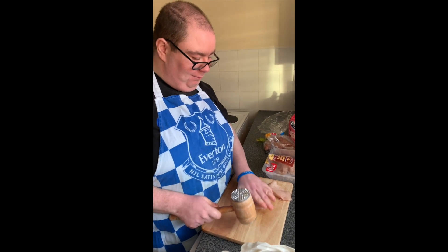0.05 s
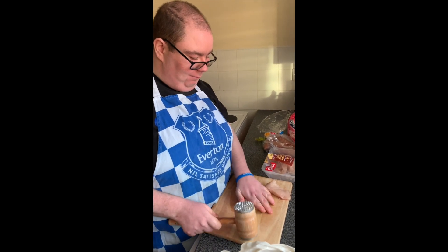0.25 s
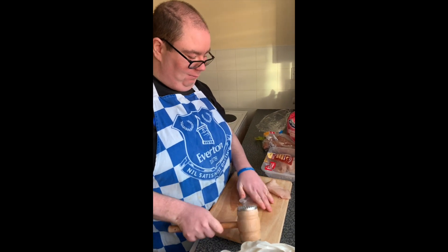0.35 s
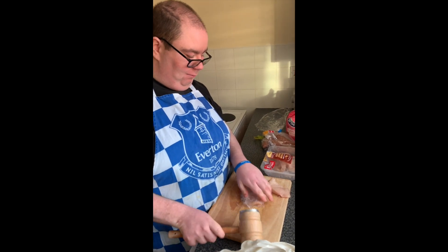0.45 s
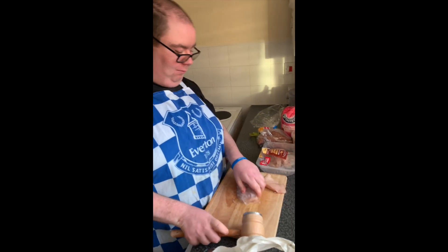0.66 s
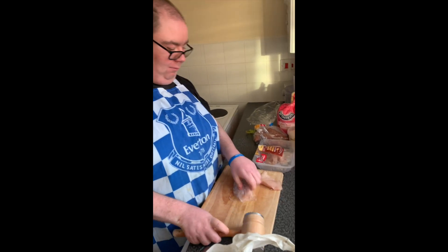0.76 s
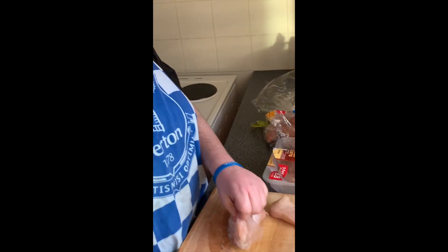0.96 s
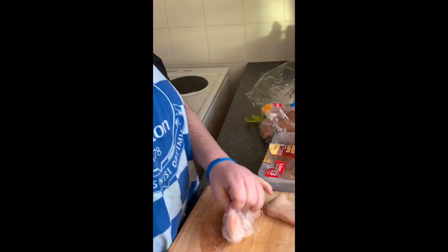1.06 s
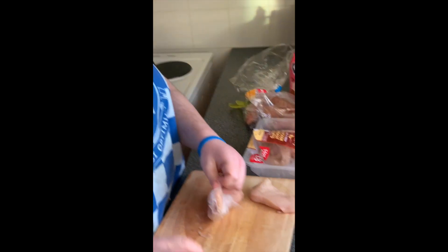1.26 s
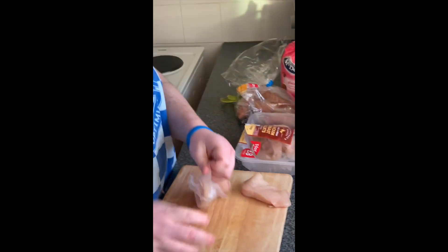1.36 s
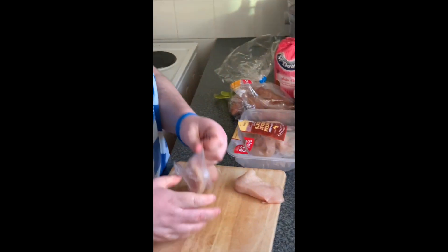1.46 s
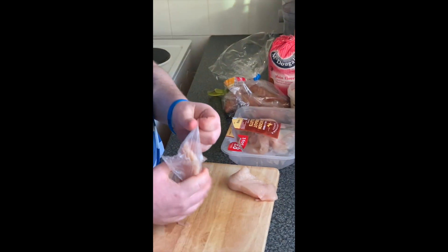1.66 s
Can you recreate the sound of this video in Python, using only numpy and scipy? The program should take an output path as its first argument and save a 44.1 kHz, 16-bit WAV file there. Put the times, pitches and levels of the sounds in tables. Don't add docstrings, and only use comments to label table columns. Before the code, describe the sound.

A meat mallet thuds on bagged chicken on a wooden board, heard close in a small tiled kitchen. After a faint rustle near 0.1 s, blows land at about 0.24, 0.52 and 0.8 s, the first bouncing rapidly, each with a plastic slap and low worktop boom. Softer knocks at 1.1-1.2 s lay the mallet down; the bag rustles until 1.5 s over faint fridge hum, with a slight late rattle.

```python
import sys
import numpy as np
from scipy import signal
from scipy.fft import rfft, irfft, next_fast_len
from scipy.io import wavfile
from scipy.ndimage import map_coordinates

SR = 44100
rng = np.random.default_rng(int(sys.argv[2]) if len(sys.argv) > 2 else 0)


def level_to_linear(level):
    exponent = np.asarray(level, float) / 20
    return 10 ** exponent


def output_pcm(signal):
    pcm = np.clip(np.atleast_2d(signal).T, -1, 1) * 32767
    wavfile.write(sys.argv[1], SR, np.round(pcm).astype(np.int16))


N = 74970

# f/Hz, density/dB per Hz
AIR_SPECTRUM = [(25, -4), (55, 6.5), (110, -6.5), (165, -12.5), (300, -7.5), (1000, -14), (3000, -28),
                (15600, -42.5)]
# f/Hz, likeness/0..1
AIR_LIKENESS = [(60, .99), (200, .88), (1000, .5), (5000, .6), (7000, .93), (15000, .96)]
# t/s, level/dB
AIR_DRIFT = [(0, -2), (.1, -0.5), (.2, 2.5), (.45, 6), (.75, 6), (1.05, 0.5), (1.3, 1), (1.45, 1),
             (1.58, 4), (1.7, 0.5)]
# f/Hz, width/Hz, level/dB
FRIDGE_HUMS = [(105, 22, -51.5), (285, 28, -60.5), (914, 40, -65)]
RATTLE_FROM_S, RATTLE = 1.39, (1385, 48, -60)

# t/s, level/dB
HANDLING_LEVEL = [(0, -70), (0.035, -67.5), (0.068, -62.5), (0.097, -44.5), (0.195, -66.5), (0.225, -68),
                  (0.245, -58), (0.41, -53), (0.49, -63), (0.53, -55.5), (0.74, -61), (0.81, -55),
                  (0.98, -55.5), (1.14, -61), (1.4, -53.5), (1.525, -67.5), (1.62, -62), (1.7, -65)]
# f/Hz, density/dB per Hz
BAG_SPECTRUM = [(500, -5), (1500, -2), (2600, -1.5), (5000, -8), (7000, -7.5), (8600, -5.5), (13500, -15.5),
                (15700, -16)]
# f/Hz, likeness/0..1
BAG_LIKENESS = [(500, 0.17), (3000, 0.067), (6500, 0.76), (15000, 1)]

# t/s, level/dB, centre f/Hz, t60/s
BAG_SCUFFS = [
    (0.082, -37, 2900, 0.14),
    (0.41, -39, 595, 0.36),
    (0.29, -35.5, 1180, 0.081),
    (0.745, -32, 223, 0.23),
    (0.850, -36, 2030, 0.2),
    (1.105, -39.5, 610, 0.7),
    (1.450, -43, 750, 0.25),
    (0.815, -42, 6000, 0.32),
    (1.240, -34.5, 276, 0.24),
]
# t/s, level/dB, centre f/Hz, t60/s
BAG_SLAPS = [(0.2355, -29, 716, 0.044), (0.235, -40, 2030, 0.087), (0.235, -35, 3760, 0.045),
             (0.297, -34.5, 1120, 0.035), (0.299, -39.5, 3370, 0.037), (0.511, -26.5, 1650, 0.096),
             (0.515, -18, 3000, 0.039), (0.517, -43, 4900, 0.12), (0.800, -32, 855, 0.063),
             (0.801, -38.5, 2720, 0.19), (0.822, -33.5, 1380, 0.1), (1.097, -45, 940, 0.084),
             (1.169, -30.5, 1470, 0.049), (1.168, -32.5, 2730, 0.027), (1.265, -50.5, 1880, 0.059),
             (1.396, -52, 1380, 0.057), (1.432, -45, 4200, 0.059)]
SLAP_RISE_S, SCUFF_RISE_S, SLAP_WIDTH = 0.00091, 0.0096, 0.41

# t/s, level/dB, pitch f/Hz, t60/s
WORKTOP_BOOMS = [(0.128, -35, 73, .6), (0.238, -20, 99.7, 0.22), (0.280, -16, 76.3, 0.31),
                 (0.340, -24.5, 81, 0.33), (0.413, -50, 74, 0.46), (0.487, -27.5, 81, 0.74),
                 (0.523, -17.5, 102, 0.28), (0.555, -14.5, 75.1, 0.59), (0.659, -26.5, 74, 0.98),
                 (0.805, -25.5, 92, 0.51), (0.866, -22, 69.3, 0.53), (0.984, -36, 75.8, 0.37),
                 (1.102, -40, 105, 0.75), (1.179, -26, 106, 0.39), (1.225, -21, 82.8, 0.23),
                 (1.265, -32.5, 85.3, 0.29), (1.309, -29.5, 79, 0.27), (1.379, -31.5, 60, 0.11),
                 (1.479, -41, 70, 0.3)]
# multiple of the pitch, level/dB, share of the t60
WORKTOP_MODES = [(.62, -12, 0.82), (1.001, 3, 0.87), (1.4, -10, 1), (1.9, -29, 0.21)]

# t/s, thud level/dB, focus f/Hz, focus width/ln Hz, decay stretch
MALLET_CONTACTS = [(0.209, -35.5, 285, 0.55, 0.67), (0.2346, -21, 615, 1, 0.79),
                   (0.2461, -8.5, 325, 0.31, 0.67), (0.2643, -19.5, 330, 0.48, 0.67),
                   (0.286, -26, 275, 0.84, 1.54), (0.304, -20.5, 286, 0.63, 0.83),
                   (0.323, -21, 280, 0.63, 0.53), (0.353, -29.5, 260, 0.47, 1.2),
                   (0.381, -27.5, 238, 0.28, 0.89), (0.446, -24.5, 227, 0.33, 1.6),
                   (0.512, -16, 864, 0.93, 0.89), (0.5231, -4, 260, 0.33, 0.28),
                   (0.535, -14, 352, 0.32, 0.94), (0.556, -22, 219, 0.42, 0.92),
                   (0.658, -33.5, 245, 0.39, 1.6), (0.720, -34.5, 231, 0.47, 0.75),
                   (0.800, -8, 750, 0.71, 0.49), (0.814, -10, 403, 0.74, 0.31),
                   (0.826, -8.5, 351, 0.28, 0.54), (0.867, -28.5, 400, 0.61, 0.68),
                   (1.097, -33.5, 700, 0.95, 1.02), (1.138, -30, 210, 0.78, 1.64),
                   (1.178, -26, 205, 0.58, 0.6), (1.196, -25, 260, 0.93, 0.42)]
# f/Hz, level/dB, t60/s
BOARD_MODES = [(205, -5, 0.16), (260, 0, .12), (320.8, -2, 0.16), (408.2, 5.5, 0.061), (454.8, -1.5, 0.085),
               (527.7, -2, 0.15), (635.3, 3.5, 0.072), (750, -5.5, 0.12), (851, -9, 0.1),
               (953, -3.5, 0.047), (1027, -2, 0.042), (1235, -7.5, 0.064), (1427, -4, 0.044),
               (1643, -4, 0.033)]
BOARD_RISE_S, WORKTOP_RISE_S, SCATTER_DB = 0.0016, 0.0059, 4

# t/s, level/dB, f/Hz, t60/s
BOARD_KNOCKS = [(0.235, -21.5, 418, 0.069), (0.306, -16, 230, 0.048), (0.456, -19, 221.4, 0.14),
                (0.5563, -11.5, 171, 0.025), (0.805, -15, 606, 0.023), (1.099, -20.5, 395, 0.061),
                (1.124, -30, 310, 0.071), (1.1795, -14, 183, 0.045), (1.1932, -20.5, 173, .04),
                (1.208, -26.5, 328, 0.049), (1.336, -44, 286, .1), (1.465, -45, 219, 0.11),
                (1.521, -47, 294, 0.078), (0.234, -36, 3930, 0.053), (0.294, -41, 3990, 0.037),
                (0.238, -20.5, 557, 0.075), (0.250, -31, 852, .1), (0.513, -24.5, 1129, .08),
                (0.530, -25, 620, 0.086), (0.5245, -12, 250, 0.024), (0.801, -28, 1048, .07),
                (1.168, -30.5, 912, .05), (1.170, -42, 3700, .04), (0.240, -31.5, 46, 0.43),
                (0.520, -30.5, 47, 0.57)]
KNOCK_RISE_S = 0.0014

# f/Hz, t60/s
TILE_DECAY = [(70, 0.36), (300, 0.25), (1000, 0.32), (3000, 0.21), (8000, 0.35)]
# f/Hz, level/dB
ROOM_SHARE = [(70, 7.5), (300, -10), (1000, 3), (4000, 1.5), (7000, -12.5)]
# f/Hz, phase/rad
PORT_LEAD = [(330, 0), (520, 2.3), (750, 2), (1800, -1.4), (3500, 2), (4700, .2), (7200, -np.pi),
             (9350, -2 * np.pi), (11500, -3 * np.pi), (14600, -4 * np.pi)]


def unit(x):
    return x / np.sqrt(np.mean(x ** 2) + 1e-20)


def along(points, hz):
    f, value = np.transpose(points)
    return np.interp(np.log(hz + 1), np.log(f + 1), value)


def at_each_moment(points):
    return np.interp(np.arange(N) / SR, *np.transpose(points))


def wobble(rate):
    knots = rng.standard_normal(int(N * rate / SR) + 4)
    return map_coordinates(knots, [np.arange(N) * rate / SR])


def filtered(x, response):
    size = next_fast_len(x.shape[-1] + 8192)
    spectrum = rfft(x, size) * response(np.fft.rfftfreq(size, 1 / SR))
    return irfft(spectrum, size)[..., :x.shape[-1]]


def focus(hz, centre_hz, width):
    distance = np.log((hz + 1) / centre_hz) / width
    return 1 / (1 + distance ** 2) ** 1.69


def pair(a, b, spectrum, alike):
    def mid_and_side(hz):
        turn = np.arccos(np.clip(along(alike, hz), -1, 1)) / 2
        return level_to_linear(along(spectrum, hz)) * [np.cos(turn), np.sin(turn)]

    mid, side = filtered(np.array([a, b]), mid_and_side)
    return unit(np.array([mid + side, mid - side]))


def ringing(modes, t, rise_s, stretch):
    hz, db, t60 = np.transpose(modes)[:, :, None]
    level_luck, pitch_luck = rng.standard_normal((2, len(modes), 1))
    decay = level_to_linear(db + SCATTER_DB * level_luck - 60 * t / (t60 * stretch))
    gain = decay * (1 - np.exp(-t / rise_s))
    return gain * np.sin(2 * np.pi * hz * (1 + 0.0389 * pitch_luck) * t)


def kitchen(x):
    hz, t, z = signal.stft(rng.standard_normal((2, SR // 2)), SR, nperseg=256)
    fade = level_to_linear(-60 * t / along(TILE_DECAY, hz)[:, None])
    fade = fade / np.sqrt(np.sum(fade ** 2, axis=1, keepdims=True))
    fade = fade * level_to_linear(along(ROOM_SHARE, hz))[:, None]
    tail = signal.istft(z * fade, SR, nperseg=256)[1] / np.sqrt(128)
    return signal.fftconvolve(np.pad(x, (220, 0))[None], tail, axes=1)


def near_and_far(sounds):
    out = np.zeros((2, N + 2 * SR))
    for s, sound in sounds:
        echo = kitchen(sound)
        start = round(s * SR)
        out[:, start:][:, :len(sound)] += sound
        out[:, start:][:, :echo.shape[1]] += echo
    return out[:, :N]


def narrow(hz, width, db):
    noise = rng.standard_normal(N)
    return level_to_linear(db) * unit(filtered(noise, lambda f: 1 / (1 + ((f - hz) / width) ** 4)))


def air():
    level_db = -44.5 - 6.0 + at_each_moment(AIR_DRIFT) + 0.96 * wobble(5.4)
    return level_to_linear(level_db) * pair(*rng.standard_normal((2, N)), AIR_SPECTRUM, AIR_LIKENESS)


def fridge():
    hums = sum(narrow(*hum) for hum in FRIDGE_HUMS)
    joins = np.clip((np.arange(N) / SR - RATTLE_FROM_S) / .02, .1, 1)
    return hums + joins * narrow(*RATTLE)


def bag():
    level_db = at_each_moment(HANDLING_LEVEL) + 8 + 1.3 * wobble(40)
    sheets = []
    for _ in range(2):
        crinkles = (rng.random(N) < .03) * rng.standard_normal(N)
        swish = rng.standard_normal(N)
        sheets.append(swish + level_to_linear(-4.5) * unit(crinkles))
    return level_to_linear(level_db) * pair(*sheets, BAG_SPECTRUM, BAG_LIKENESS)


def bag_hisses(rows, rise_s):
    sounds, t = [], np.arange(SR // 4) / SR
    for s, db, centre_hz, t60 in rows:
        noise = rng.standard_normal(len(t))
        hiss = unit(filtered(noise, lambda hz: focus(hz, centre_hz, SLAP_WIDTH)))
        sounds.append((s, level_to_linear(db - 60 * t / t60) * (1 - np.exp(-t / rise_s)) * hiss))
    return sounds


def scuffs():
    return bag_hisses(BAG_SCUFFS, SCUFF_RISE_S)


def worktop():
    out, t = np.zeros(N + SR), np.arange(SR // 2) / SR
    next_jolts = [boom[0] for boom in WORKTOP_BOOMS[1:]] + [2 * N / SR]
    for (s, db, hz, t60), until in zip(WORKTOP_BOOMS, next_jolts):
        modes = np.array(WORKTOP_MODES) * [hz, 1, t60]
        stilled = np.exp(-np.clip(t - (until - s), 0, None) / 0.0031)
        boom = ringing(modes, t, WORKTOP_RISE_S, 0.98).sum(axis=0)
        out[round(s * SR):][:len(t)] += level_to_linear(db) * stilled * boom
    return out[:N] * level_to_linear([[-.6], [.6]])


def thuds():
    sounds, t = [], np.arange(SR // 4) / SR
    board_hz = np.transpose(BOARD_MODES)[0]
    for s, thud_db, focus_hz, width, stretch in MALLET_CONTACTS:
        struck = focus(board_hz, focus_hz, width)
        thud = struck @ ringing(BOARD_MODES, t, BOARD_RISE_S, stretch)
        sounds.append((s, -level_to_linear(thud_db) * thud))
    return sounds


def knocks():
    sounds, t = [], np.arange(SR // 4) / SR
    for s, db, hz, t60 in BOARD_KNOCKS:
        gain = level_to_linear(db - 60 * t / t60) * (1 - np.exp(-t / KNOCK_RISE_S))
        sounds.append((s, -gain * np.sin(2 * np.pi * hz * t)))
    return sounds


def slaps():
    return bag_hisses(BAG_SLAPS, SLAP_RISE_S)


def scene():
    mallet = near_and_far(thuds() + slaps() + scuffs())
    return mallet + worktop() + bag() + air() + fridge() + near_and_far(knocks())


def ports(x):
    hz, lead = np.transpose(PORT_LEAD)
    sides = np.array([[1], [-1]])
    return filtered(x, lambda f: np.exp(.5j * np.interp(f, hz, lead) * sides))


def band_limit(x):
    return signal.sosfilt(signal.butter(12, 15690, fs=SR, output="sos"), x)


def record(dry):
    mix = filtered(ports(dry), lambda hz: (hz < 15750) / (1 + (40 / (hz + 1)) ** 6))
    return band_limit(mix)


dry = scene()
out = record(dry)
output_pcm(out)
```